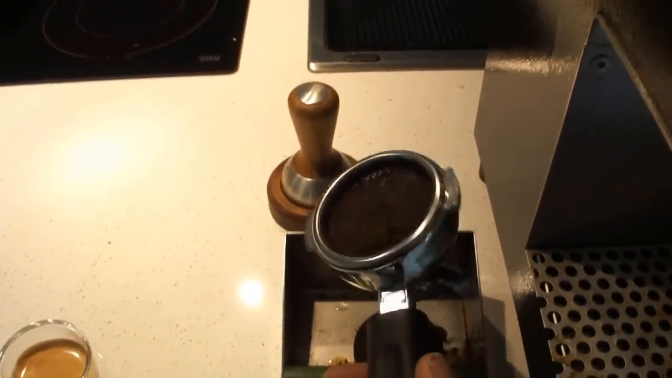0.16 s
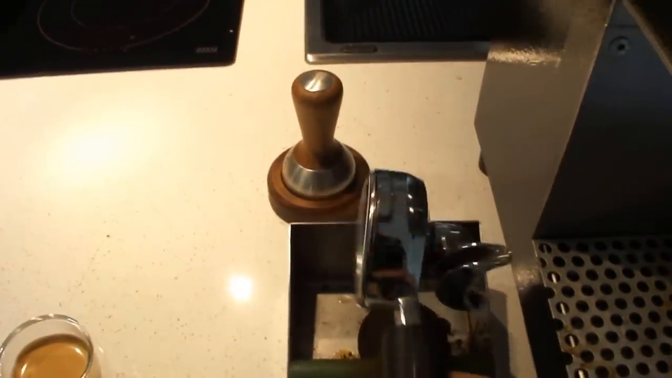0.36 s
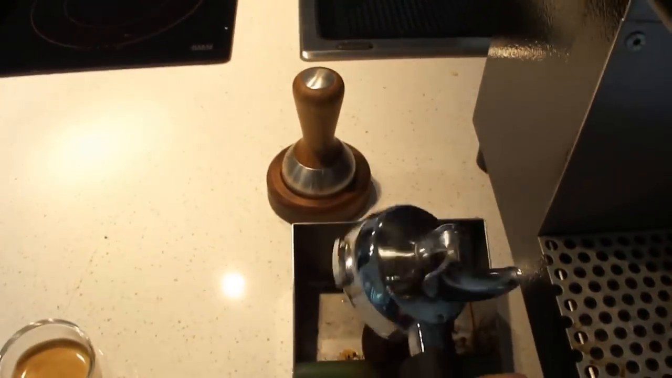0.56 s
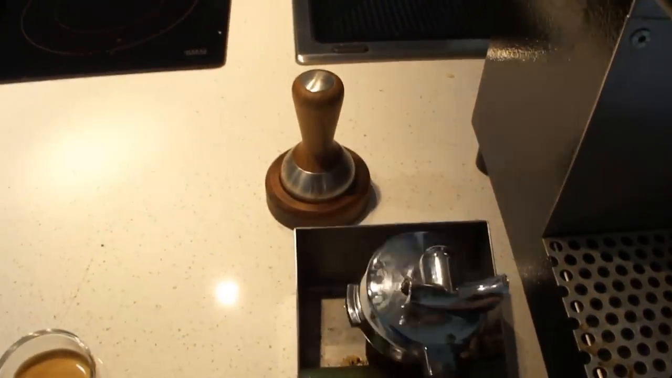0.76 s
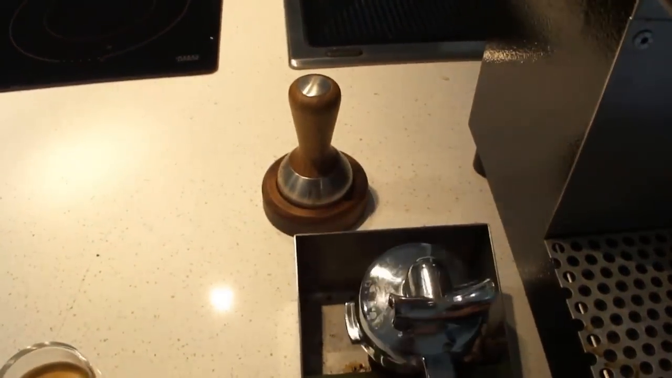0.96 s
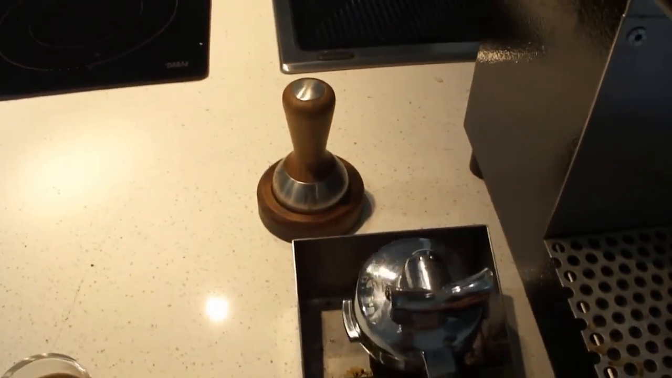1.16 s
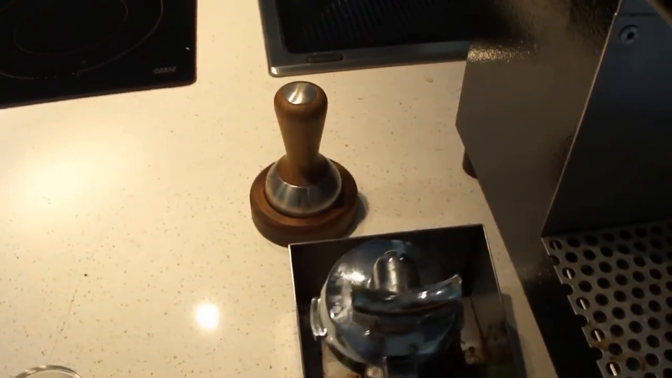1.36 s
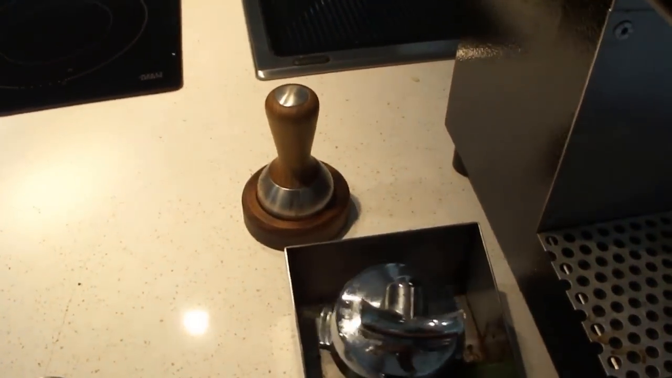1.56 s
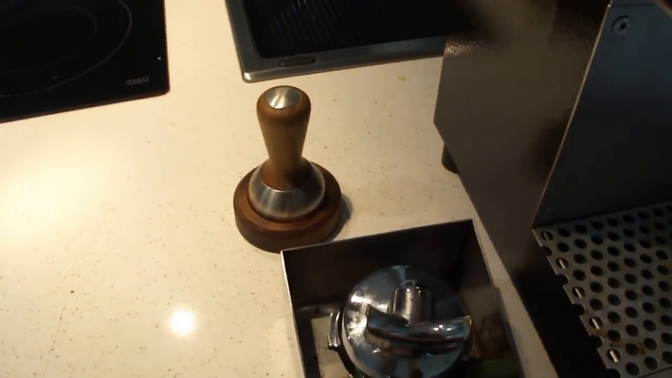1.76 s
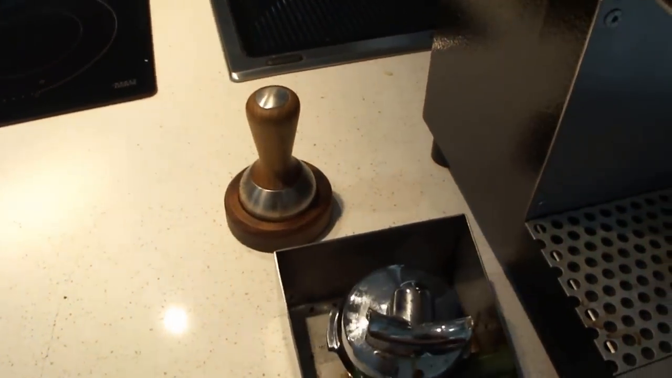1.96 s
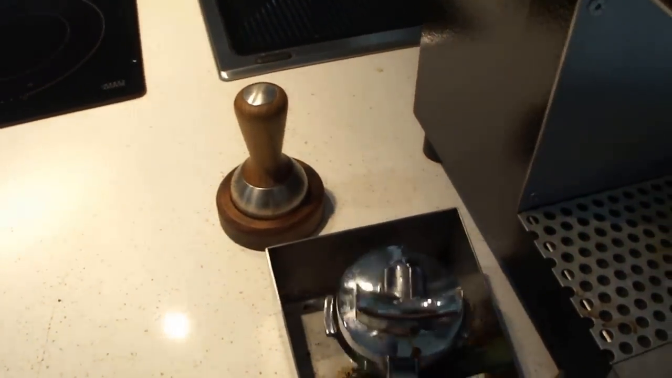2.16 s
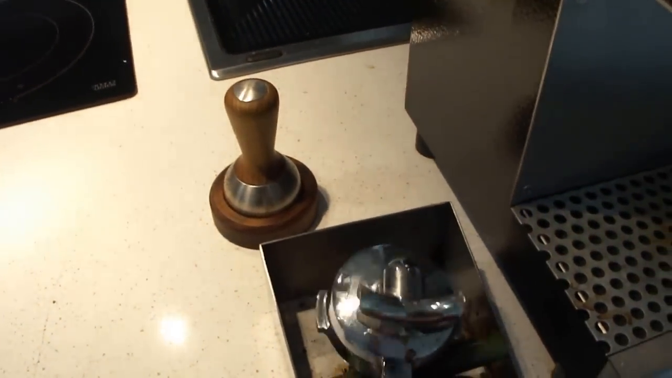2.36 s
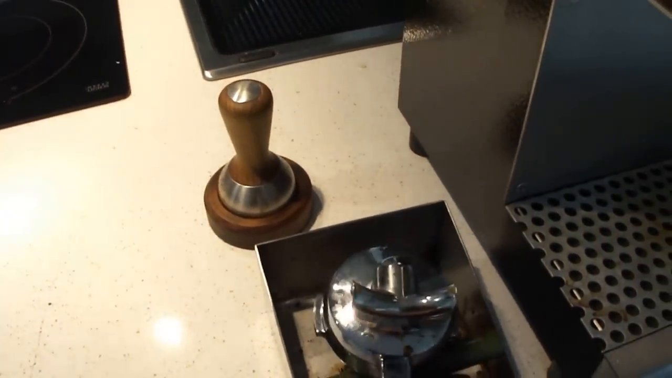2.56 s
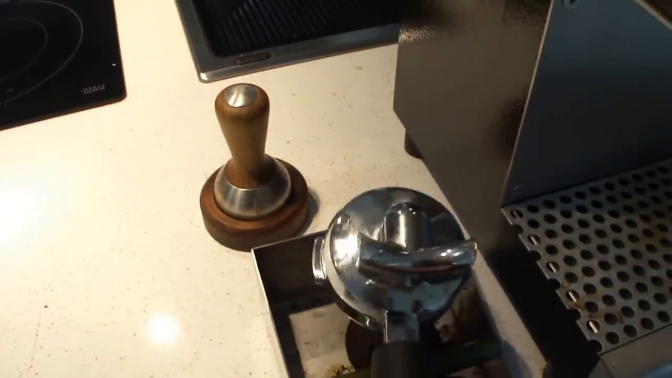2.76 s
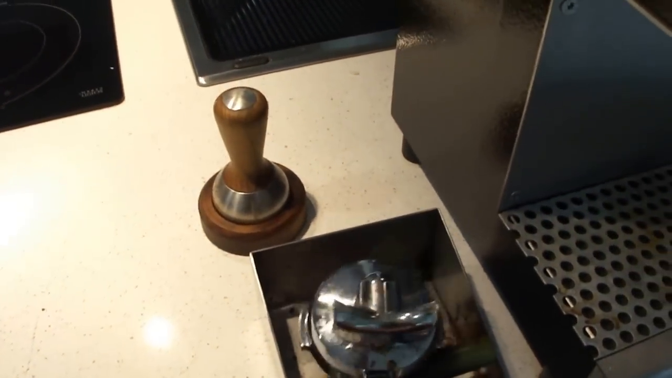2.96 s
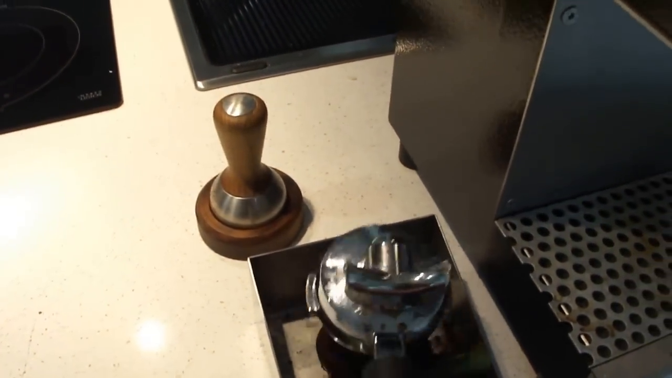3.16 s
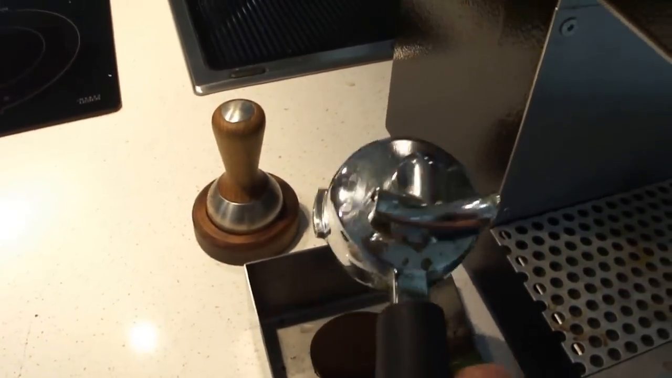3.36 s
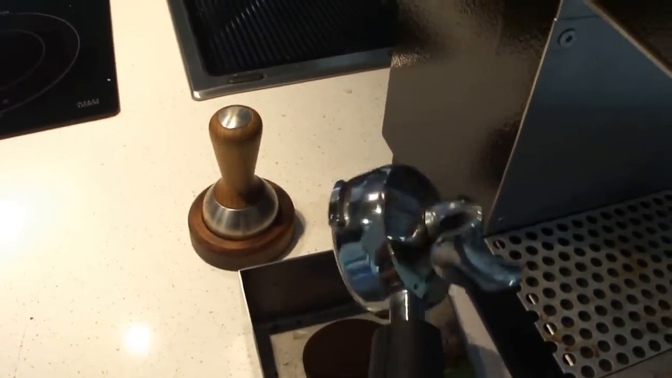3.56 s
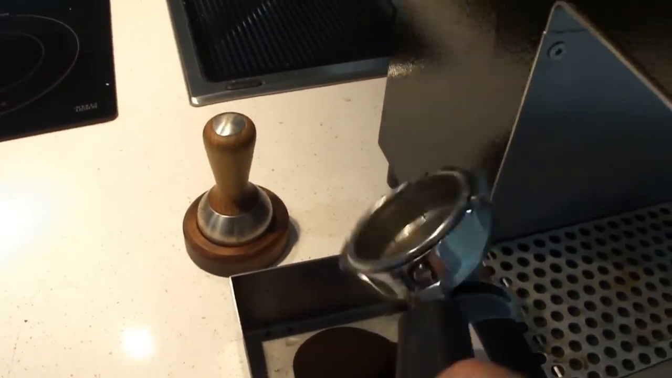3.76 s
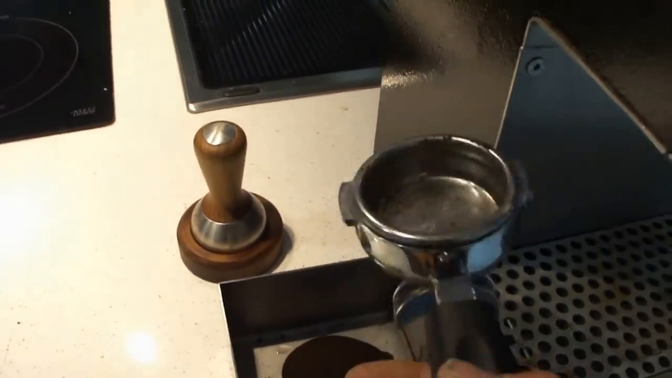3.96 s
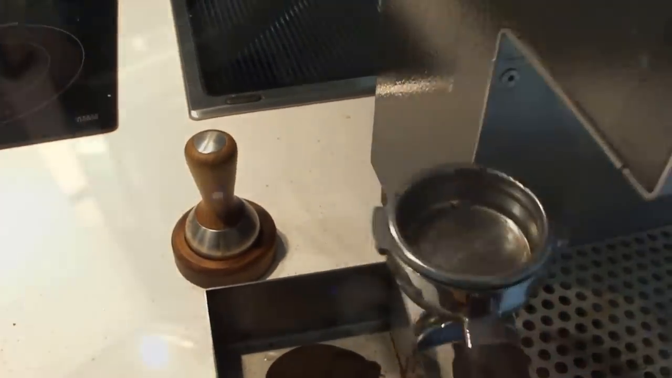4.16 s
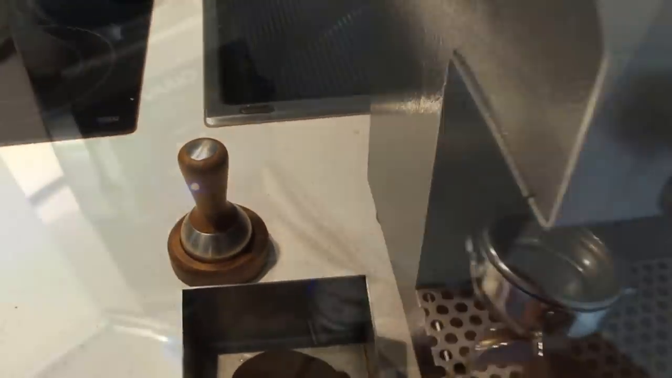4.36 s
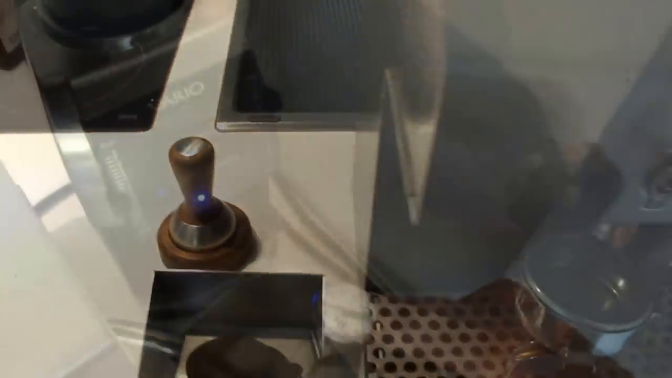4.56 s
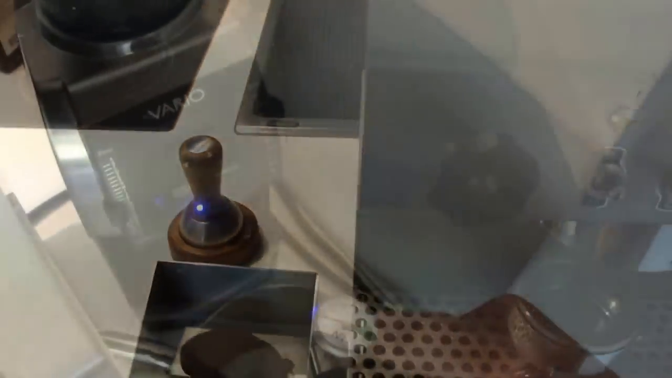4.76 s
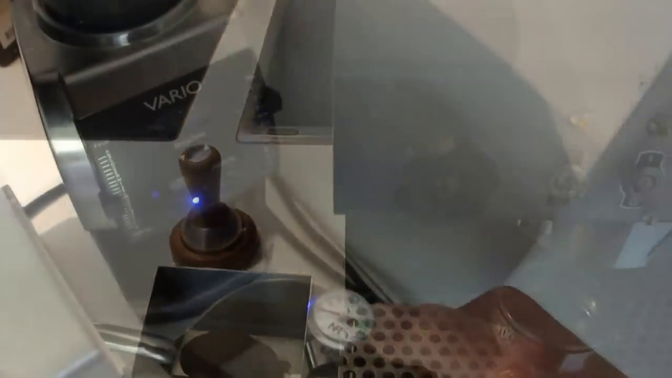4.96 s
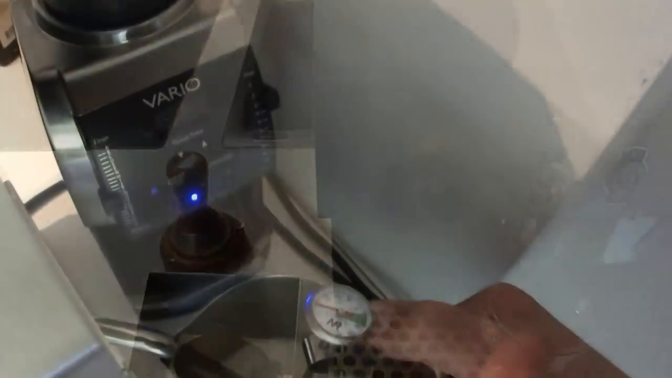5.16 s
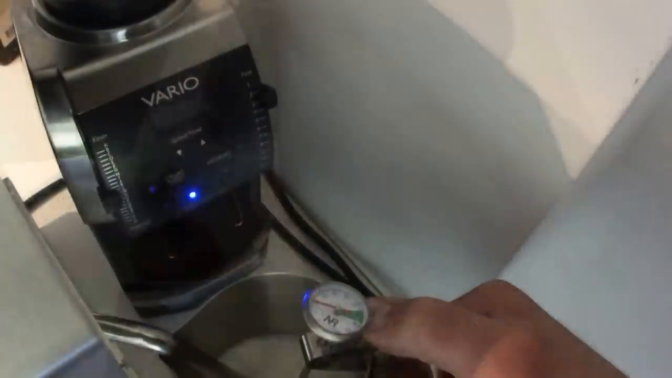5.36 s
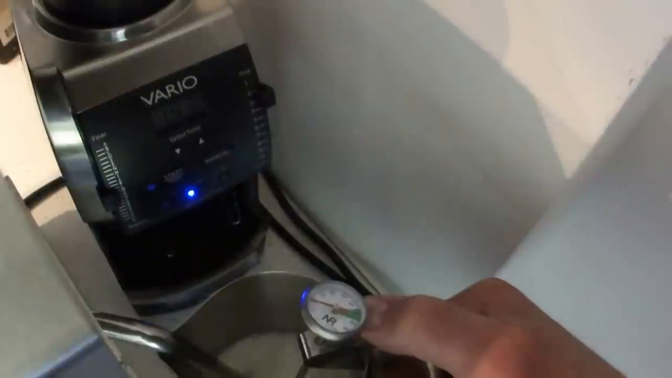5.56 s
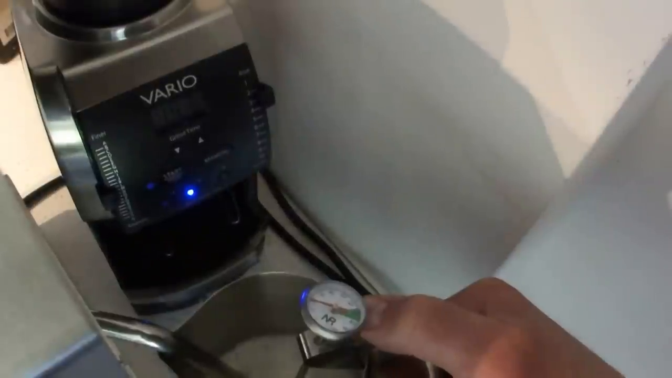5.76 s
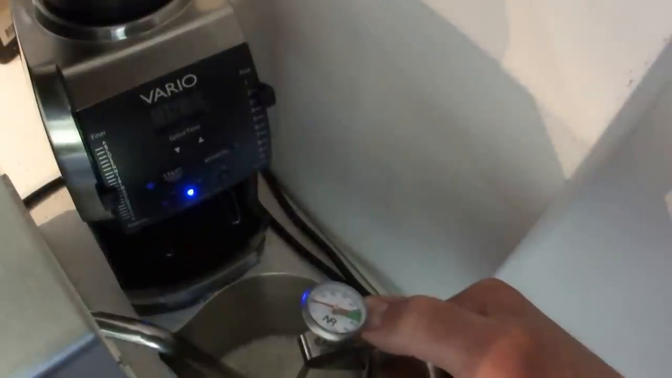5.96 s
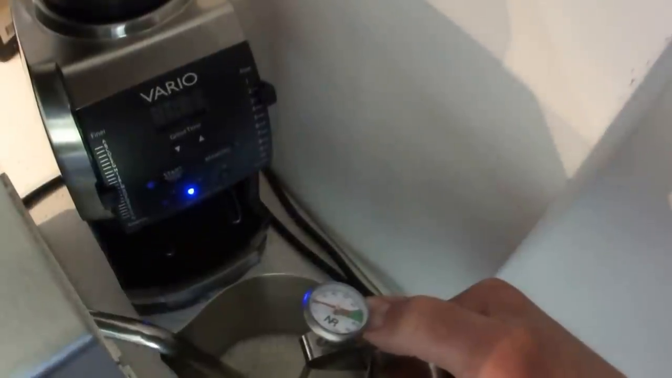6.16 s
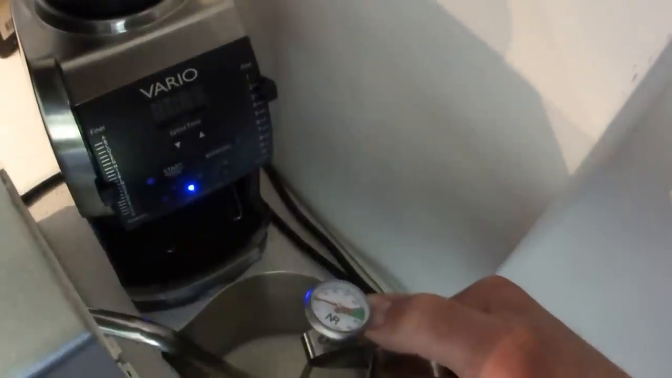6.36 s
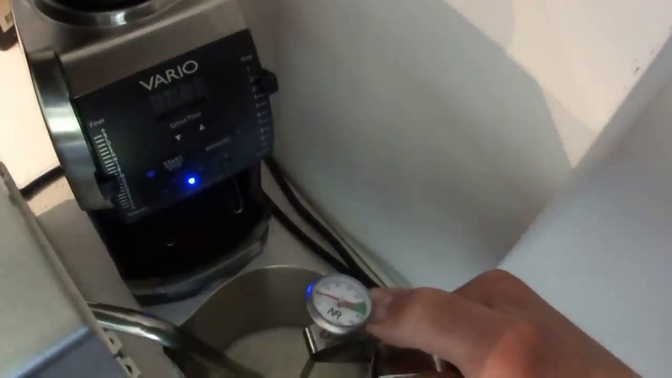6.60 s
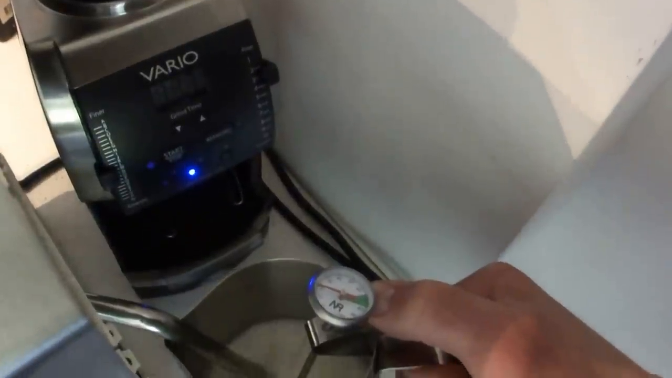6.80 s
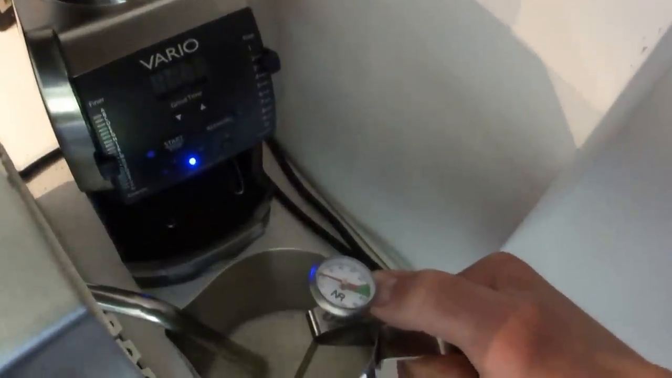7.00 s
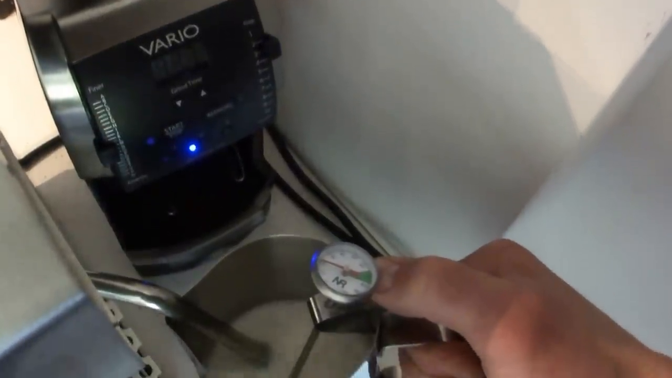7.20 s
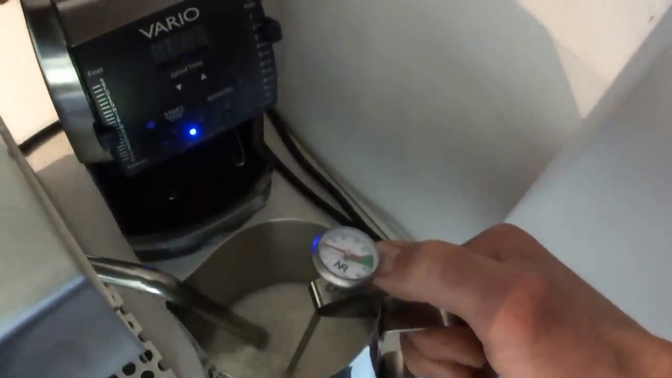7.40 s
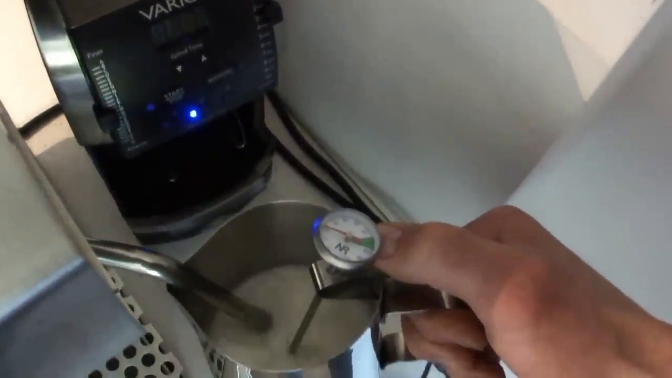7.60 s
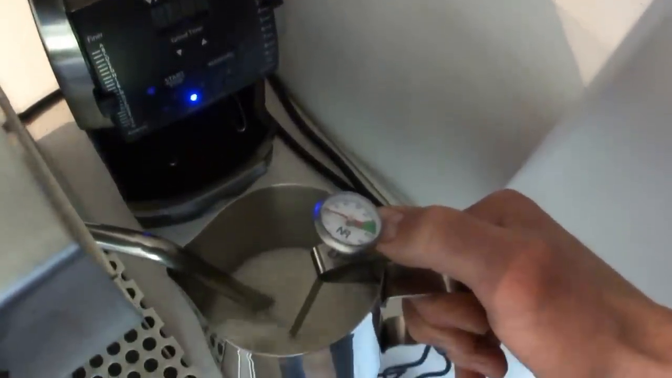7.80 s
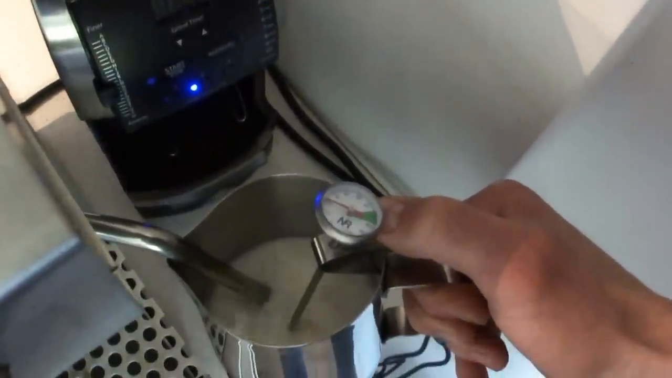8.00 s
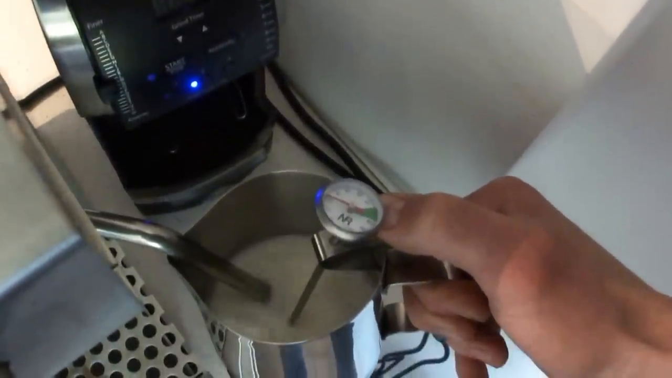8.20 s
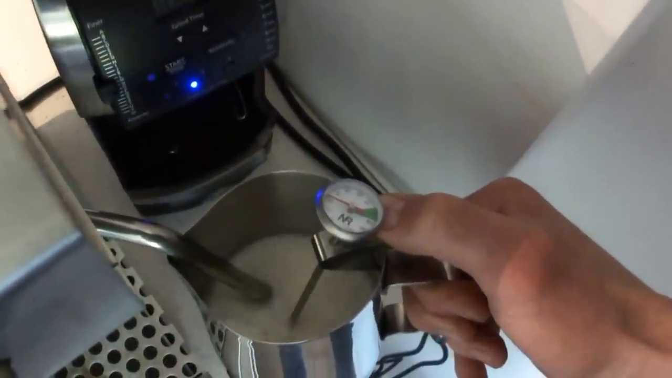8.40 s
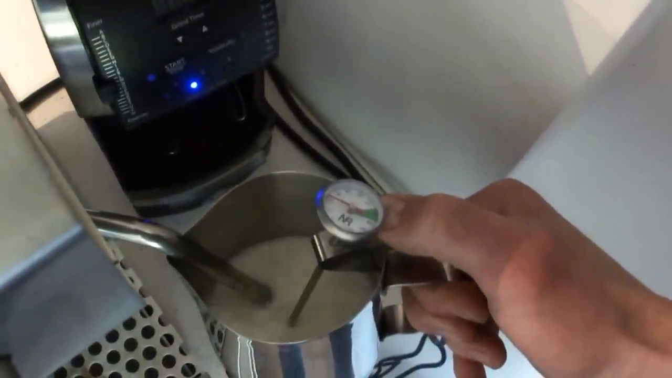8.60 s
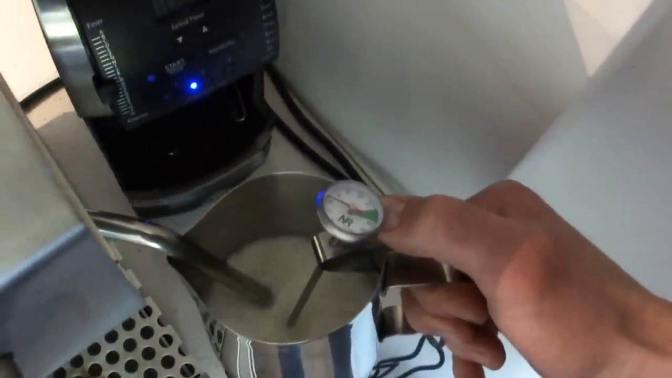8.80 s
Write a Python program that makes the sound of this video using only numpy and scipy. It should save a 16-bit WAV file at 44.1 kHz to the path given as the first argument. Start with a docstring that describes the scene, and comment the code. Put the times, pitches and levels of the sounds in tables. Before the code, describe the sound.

A small hard-walled kitchen, heard close in stereo, with a low appliance drone and thin airy hiss, brushed by faint swishes in the first half second. At about 0.95 s a metal filter basket clacks loudly on a knock box bar, with tiny follow-up contacts; a soft low thud comes at 1.7 s. The background drops around 2.5 s as a hard bang lands, boomy and metallic, followed by a stronger one at 3.0 s, both bouncing quickly and rattling briefly in the room. A faint tap rings at 3.5 s. At 4.1 s steam bursts abruptly into a steel pitcher of milk: ripping spurts and loud hollow gulps around 800 Hz, fiercest until 5.2 s. It then steadies into a lumpy, bubbling roar with fizz and bright jet hiss, a spurt at 6.8 s, a brief dip near 6.9 s, and renewed gulps after 7.9 s, still running at the end.

```python
"""A steam wand sputters open and roars in a steel pitcher of milk: jet hiss, spurts of air, imploding bubbles.
Before it a steel filter basket is set on the bar of a knock box, then banged on it twice, in a hard-walled
kitchen. Decaying modes make the knocks; noise through resonances, under level curves, makes the steam;
decaying sines make the gulps of collapsing bubbles. The sound has notches at 3, 4 and 5 kHz and a broad
dip around 12 to 14 kHz."""
import sys
import numpy as np
from scipy import signal
from scipy.fft import rfft, irfft, next_fast_len
from scipy.io import wavfile
from scipy.ndimage import uniform_filter1d, map_coordinates

SR = 44100
rng = np.random.default_rng(int(sys.argv[2]) if len(sys.argv) > 2 else 0)


def to_wav(sig):
    """Store sig (one row per channel, or 1-D mono) as 16-bit WAV at the path in sys.argv[1].

    Samples outside -1..1 are clipped; the rate is SR.
    """
    pcm = np.clip(np.atleast_2d(sig), -1, 1) * 32767
    pcm = np.round(pcm).astype(np.int16)
    wavfile.write(sys.argv[1], SR, pcm.T)  # frames by channels


N = 389844
T = np.arange(N) / SR  # time in seconds

# Steam in the milk. Each row: time in seconds, then levels in dB of the pitcher roar, the fizz and the jet hiss.
STEAM = [(4.08, -51, -67, -57), (4.13, -51, -40, -48), (4.25, -31.5, -40.5, -40), (4.45, -38.5, -44, -38.5),
         (4.6, -31, -31, -44), (4.73, -29.5, -38, -39), (4.83, -35, -36.5, -41), (5.01, -26, -31.5, -40.5),
         (5.39, -34.5, -37.5, -41), (5.66, -33.5, -35, -39), (5.86, -34.5, -33, -35.5),
         (6.08, -34.5, -33.5, -34.5), (6.6, -31.5, -32, -34), (6.74, -32.5, -34, -31), (6.9, -42, -39, -38),
         (7.17, -38.5, -38.5, -38.5), (7.43, -39.5, -33, -35.5), (7.57, -36, -36.5, -33.5),
         (7.84, -34.5, -35.5, -37), (8.07, -34, -29, -36), (8.28, -33, -35.5, -33.5),
         (8.84, -35, -29, -35.5)]
# Large collapsing bubbles. Each row: start in seconds, peak in dB, pitch in Hz, low part in dB re the peak.
GULPS = [(4.078, -25, 820, -14), (4.108, -19.5, 807, -26), (4.195, -25.5, 789, -28), (4.261, -13, 846, -22),
         (4.315, -10.5, 780, -18.5), (4.463, -23.5, 880, -23), (4.571, -21, 920, -24),
         (4.618, -5, 794, -32), (4.65, -16, 903, -28), (4.77, -21.5, 748, -12), (4.805, -16, 762, -27),
         (4.867, -20.5, 778, -36), (4.919, -19.5, 872, -29), (5.105, -17, 1155, -29),
         (5.193, -18, 882, -29), (5.436, -23, 840, -15.5), (5.594, -21, 842, -36), (5.819, -28.5, 750, -18),
         (6.329, -24.5, 898, -19), (6.787, -18, 786, -39), (7.635, -31, 876, -14), (7.915, -17, 854, -25),
         (7.998, -23, 802, -36), (8.168, -18.5, 734, -23), (8.222, -19.5, 785, -24.5),
         (8.433, -17, 846, -14), (8.624, -22, 853, -35.5), (8.765, -13, 870, -31)]
# Correlation of left and right. Each row: frequency in Hz, likeness (1 is identical).
ALIKE = [(100, 1), (300, 1), (700, 0.99), (1500, 0.91), (2500, 0.91), (6000, 0.78), (10000, 0.38),
         (15000, 0.11)]


def amp(db):
    """Decibel law: 20 dB is a factor of ten in amplitude."""
    return 10 ** (np.asarray(db) / 20)


def unit(x):
    """Normalization to an rms of 1."""
    return x / np.sqrt(np.mean(x ** 2) + 1e-20)


def along(points, hz):
    """Interpolation of (Hz, value) points on a logarithmic frequency axis."""
    f, v = np.transpose(points)
    return np.interp(np.log(hz + 1), np.log(f + 1), v)


def curves(rows):
    """Linear interpolation in time: one value per sample for each column after the time."""
    s, *cols = np.transpose(rows)
    return [np.interp(T, s, c) for c in cols]


def wobble(rate):
    """Slow random modulation: a spline through rate random knots a second."""
    knots = rng.standard_normal(int(N * rate / SR) + 4)
    return map_coordinates(knots, [T * rate])


def filtered(x, response):
    """Linear filtering: the spectrum times a complex response of frequency."""
    m = next_fast_len(x.shape[-1] + SR // 2)
    spectrum = rfft(x, m) * response(np.fft.rfftfreq(m, 1 / SR))
    return irfft(spectrum, m)[..., :x.shape[-1]]


def coloured(points):
    """Spectral colouring: the zero-phase gain of (Hz, dB) points."""
    return lambda hz: amp(along(points, hz))


def resonant(modes):
    """Modal superposition: causal (Hz, width in Hz, dB) resonances of alternating sign."""
    def response(f):
        total = 0
        for k, (c, w, db) in enumerate(modes):
            total = total + (-1) ** k * amp(db) * 1j * f * w / (c * c - f * f + 1j * f * w)
        return total
    return response


def half_angle(alike, hz):
    """Stereo correlation: the angle that shares power between mid and side for a given likeness."""
    return np.arccos(np.clip(along(alike, hz), -1, 1)) / 2


def rush(response, patchy_db, lumps=1, alike=ALIKE):
    """Turbulent noise in stereo, rms 1, with patches of random gain; lumps shape it before the resonances."""
    z = signal.stft(rng.standard_normal((2, N)), nperseg=512)[2]
    field = uniform_filter1d(rng.standard_normal(z.shape[1:]), 6, 0)
    field = uniform_filter1d(field, 10, 1)
    pair = lumps * signal.istft(z * amp(patchy_db * unit(field)), nperseg=512)[1][:, :N]

    def shared(hz):
        turn = half_angle(alike, hz)
        return response(hz) * [np.cos(turn), np.sin(turn)]

    mid, side = filtered(pair, shared)
    return unit(np.array([mid + side, mid - side]))


def kitchen():
    """Background noise under level curves: appliance drone and airy hiss that rise, fall and sink under the steam."""
    # Background. Each row: time in seconds, level of the drone in dB, level of the airy hiss in dB.
    background = [(0.0, -42.5, -51.5), (0.81, -38, -48), (2.48, -40, -50), (2.63, -48, -58),
                  (2.79, -50, -60), (3.05, -48, -59), (3.18, -49, -51), (3.38, -48, -60.5),
                  (4.06, -45, -53)]
    # Spectra of drone and hiss. Each row: frequency in Hz, gain in dB.
    drone_spectrum = [(40, -29), (100, -18), (200, -3.5), (320, 0.5), (1000, -4), (2000, -6.5),
                      (2800, -21.5), (5000, -33.5), (7000, -50)]
    air_spectrum = [(2500, -20), (4500, -18), (6000, 5.5), (7000, -3), (8000, 2), (11000, -8.5),
                    (14000, -22), (15700, -5), (15900, -50)]
    # Brief swells of the hiss. Each row: centre in seconds, peak in dB.
    swishes = [(.26, -48), (.43, -51), (2.0, -53), (3.78, -65), (3.91, -69)]
    # Correlation of left and right. Each row: frequency in Hz, likeness (negative is opposed).
    diffuse = [(100, -0.077), (1400, -0.31), (3100, 0.22), (6800, 0.49), (15000, 0.17)]
    under_steam_db, fade_s, swish_s = -6, 4.5, 0.055  # swish_s: half width of a swell

    drone_db, air_db = curves(background)
    sink = amp(under_steam_db * np.clip((T - STEAM[0][0]) / fade_s, 0, 1))
    air_level = amp(air_db)
    for s, db in swishes:
        air_level += amp(db) * np.exp(-((T - s) / swish_s) ** 2)
    drone = amp(drone_db) * rush(coloured(drone_spectrum), patchy_db=0.5, alike=diffuse)
    air = air_level * rush(coloured(air_spectrum), patchy_db=1.0, alike=diffuse)
    return sink * (drone + air)


def echo():
    """Reverberation: a fresh stereo tail of rattle in the room; each frequency dies at its own speed."""
    # Spectrum of the rattle. Each row: frequency in Hz, level in dB.
    rattle_spectrum = [(50, -38), (140, 8.5), (300, -5.5), (1000, 3.5), (2000, -7), (3500, -20.5),
                       (6500, -6.5), (10000, -9.5), (16000, -20)]
    # Absorption by the hard walls. Each row: frequency in Hz, time in seconds to fall 60 dB.
    walls = [(100, 0.59), (500, 0.54), (2000, 0.71), (6000, 0.51), (15000, .2)]
    hz, t, z = signal.stft(rng.standard_normal((2, SR // 2)), SR, nperseg=256)
    turn = half_angle(ALIKE, hz)[:, None]
    signs = np.array([1, -1])[:, None, None]
    z = np.cos(turn) * z[0] + signs * np.sin(turn) * z[1]
    decay_db = along(rattle_spectrum, hz)[:, None] - 60 * t / along(walls, hz)[:, None]
    return signal.istft(z * amp(decay_db), SR, nperseg=256)[1][:, :SR // 2]


def knocks():
    """Impact excitation of modes: contacts crack and ring basket and box; loose parts flutter, the room rattles."""
    # Basket contacts. Each row: start in seconds, level in dB, kind.
    contacts = [(0.954, -2.5, "clack"), (.998, -22, "clack"), (1.013, -20.5, "clack"), (1.729, -21, "thud"),
                (2.452, -6.5, "bang"), (2.461, -12.5, "bang"), (2.49, -13.5, "bounce"),
                (3.012, -4.5, "bang"), (3.016, -9, "bang"), (3.038, -12, "bounce"),
                (3.074, -13.5, "bounce"), (3.534, -29.5, "tap")]
    # Modes of box and basket. Each row: frequency in Hz, relative level in dB, seconds to fall 60 dB (unscaled).
    modes = [(148.6, 6, 0.3), (177, -4, 0.37), (263, -5.5, 0.57), (302, 4.5, 0.22), (425, -0.5, 0.24),
             (650, -16, .4), (766, 1.5, 0.12), (991, -0.5, 0.35), (1057, -9.5, 0.49), (1510, -9, 0.26),
             (1534, -10, 0.47), (1768, -4.5, .2), (1820, -5, 0.33), (1878, -9, .2), (2023, -8.5, 0.52),
             (3424, -17, 0.47), (4445, -11, 0.13), (6400, 2, .6), (6620, -8, .3), (7200, 1, .5),
             (7410, -7, .4), (7840, -3, .5), (8280, -3, .45), (9370, -8, .4)]
    # Kinds of contact. Each entry: boom, thud, clank and treble in dB, factors on the ring times
    # of box and basket, rattle in dB.
    kinds = {"clack": (-29, -25, 2, -31.5, 0.7, 0.48, -16.5),
             "thud": (-0.5, -10, -25, -24, 0.97, 0.35, -35), "bang": (-3, 1, -0.5, -6.5, 0.5, 0.62, 0.5),
             "bounce": (-3.5, -3, 5, -12, 1.14, 1.1, -3), "tap": (-22, -10, 5, -32, 1.3, 0.45, -5)}
    box_top_hz = 500  # modes below belong to the knock box, those above to the basket

    out, t = np.zeros((2, N + SR)), np.arange(SR // 2) / SR
    hz, level, t60 = np.transpose(modes)[..., None]
    for s, db, kind in contacts:
        boom_db, thud_db, clank_db, treble_db, box_share, basket_share, rattle_db = kinds[kind]
        share = np.where(hz < box_top_hz, box_share, basket_share)
        # each mode wavers in level and phase, 45 random knots a second
        knots = rng.standard_normal((2, len(modes), 32))
        flutter, drift = (np.array([np.interp(t * 45, np.arange(32), k) for k in part]) for part in knots)
        loose_db = 3.5 * flutter * np.clip(t / .05, 0, 1)
        phase = 2 * np.pi * hz * t + .5 * (drift - drift[:, :1])
        ring = np.sum(amp(level + loose_db - 60 * t / (t60 * share)) * np.sin(phase), axis=0)
        crack = 3.2 * amp(-60 * t / 0.04) * rng.standard_normal(len(t))
        rattle = amp(rattle_db) * echo() * (1 - amp(-60 * t / 0.0021))
        sound = amp(-13.5) * (ring + crack) + rattle
        # padded or bare contact
        tilt = [(190, boom_db), (250, thud_db), (450, thud_db), (620, 2.5), (1080, 2.0), (1270, -2),
                (1450, clank_db), (2200, clank_db), (2600, -4.5), (4000, treble_db)]
        onset = np.clip(t / 0.0014, 0, 1)
        out[:, round(s * SR):][:, :len(t)] += amp(db) * onset * filtered(sound, coloured(tilt))
    return out[:, :N]


def blows(rows, rise, tail_db, tail_t60):
    """Power addition of incoherent bursts (s, dB, hold s, t60 s) with a weaker room tail; gives amplitude."""
    power = np.zeros(N + SR)
    t = np.arange(SR // 2) / SR
    for s, db, hold, t60 in rows:
        after = np.maximum(t - hold, 0)
        direct = amp(db - 60 * after / t60) ** 2
        tail = amp(db + tail_db - 60 * after / tail_t60) ** 2
        power[round(s * SR):][:len(t)] += (direct + tail) * np.clip(t / rise, 0, 1) ** 2
    return np.sqrt(power[:N])


def pops(rate, spread_db):
    """Shot noise of implosions: short pushes at random moments; with spread, a few are far stronger."""
    count = int(rate * N / SR)
    when, size = rng.random((count, 2)).T
    strength = amp(-spread_db * np.log(size + .1))
    drive = np.bincount((when * N).astype(int), strength, N)
    return uniform_filter1d(drive, size=130) * 130  # each push lasts 130 samples


def steam():
    """Resonance driven by implosions: bubbles in uneven clumps drive pitcher and milk; the jet itself hisses."""
    # Resonances of the milk and the air column over it, of the churning milk and of small bubbles.
    # Each row: frequency in Hz, width in Hz, level in dB.
    pitcher = [(280, 148, -10), (538, 176, -8), (837, 218, 0)]
    churn = [(1075, 470, -2.5), (1420, 199, 3.5), (1689, 510, -1)]
    bubbles = [(2250, 220, 1), (2606, 264, 0.5), (3160, 820, -12.5), (4560, 190, -7.5)]
    # Spectra of the jet and of tearing air. Each row: frequency in Hz, gain in dB.
    jet_spectrum = [(1500, -50), (4000, -22), (5700, 4.5), (6700, 6), (8000, 2), (9200, -4), (10000, -3.5),
                    (12000, -23), (15000, -29), (15800, -30), (16200, -38)]
    spurt_spectrum = [(500, -30), (2000, -20), (4500, -1.5), (6500, 7.5), (9000, 9.5), (11000, 5.5),
                      (13000, 3), (15000, -2), (15800, 4), (16400, -43)]
    # The tip breaks the surface and air tears in. Each row: start in seconds, peak in dB,
    # hold in seconds, time in seconds to fall 60 dB.
    spurts = [(4.078, -11, 0.0016, 0.08), (4.104, -11.5, 0.0088, .04), (4.119, -12, 0.022, .03),
              (4.193, -7.5, 0.0036, 0.02), (4.251, -10.5, 0.068, 0.046), (4.325, -12, 0.038, .08),
              (4.384, -10.5, 0.0041, 0.032), (4.615, -10, 0.0029, 0.013), (4.665, -2, 0.0047, 0.093),
              (4.701, -6, 0.0078, 0.02), (4.767, -5, 0.0045, 0.1), (4.946, -17, 0.036, 0.23),
              (5.02, -21, 0.081, 0.25), (5.102, -16, 0.021, 0.06), (5.118, -7, 0.0092, 0.18),
              (5.96, -24, 0.018, 0.1), (6.391, -28, 0.038, 0.12), (6.489, -19.5, 0.013, 0.12),
              (6.781, -7.5, 0.0055, 0.033), (6.893, -23, 0.006, 0.035), (7.06, -30.5, 0.0079, 0.043),
              (7.545, -27.5, 0.013, 0.06), (7.726, -22.5, 0.0064, 0.051), (7.774, -25, 0.0091, 0.067),
              (8.385, -25, 0.024, 0.11)]
    gush_db, gush_follows_roar = -3, 0.49  # the gush lies between roar and fizz
    stir_db, stir_hold_s, stir_t60_s = -16.5, 0.0073, 0.38  # a collapse stirs the roar up, under its own peak
    splash_db = -28  # a spurt whips the milk: gush and fizz under its peak
    crest_db = 6.5  # peaks of the tearing noise over its rms

    roar_db, fizz_db, jet_db = curves(STEAM)
    gush_level_db = gush_db + fizz_db + gush_follows_roar * (roar_db - fizz_db)
    bursts = blows(spurts, rise=0.00081, tail_db=-13.5, tail_t60=0.37)
    stirs = [(s, db + stir_db, stir_hold_s, stir_t60_s) for s, db, *_ in GULPS]
    stir = blows(stirs, rise=0.0068, tail_db=-2, tail_t60=0.46)
    splash = amp(splash_db) * bursts + amp(-13.5) * stir
    opening = np.clip((T - STEAM[0][0]) / 0.0037 + 1, 0, 1)

    surge = wobble(30)  # common to roar, gush and fizz
    roar_lumps = amp(1.6 * surge) * (0.5 + 0.56 * pops(45, spread_db=0))
    roar = np.hypot(amp(roar_db), stir) * rush(
        lambda f: resonant(pitcher)(f) ** 2, patchy_db=0.33, lumps=roar_lumps)
    gush_lumps = amp(0.36 * surge + 1.8 * wobble(110))
    gush = np.hypot(amp(gush_level_db), splash) * rush(
        lambda f: resonant(churn)(f) ** 2, patchy_db=2.0, lumps=gush_lumps)
    fizz_lumps = amp(1.55 * surge) * (1.5 + 0.49 * pops(70, spread_db=5.5))
    fizz = np.hypot(amp(fizz_db), splash) * rush(resonant(bubbles), patchy_db=2.0, lumps=fizz_lumps)
    jet_lumps = amp(1.15 * wobble(35)) * (1.5 + 0.26 * pops(44, spread_db=7.5))
    jet = amp(jet_db) * rush(coloured(jet_spectrum), patchy_db=3.15, lumps=jet_lumps)
    tearing = amp(-crest_db) * bursts * rush(
        coloured(spurt_spectrum), patchy_db=3.5, lumps=amp(0.53 * wobble(350)))
    return opening * (roar + gush + fizz + jet) + tearing


def gulps():
    """Free decay of an air column: a collapsing bubble rings it and sets the milk splattering lower down."""
    rise_s, ring_t60_s, splatter_t60_s = 0.0086, 0.049, 0.18
    column, drive, t = np.zeros(N + SR), np.zeros(N + SR), np.arange(SR // 8) / SR
    rise = 1 - amp(-60 * t / rise_s)
    ring = rise * amp(-60 * t / ring_t60_s)
    for s, db, hz, low_db in GULPS:
        start = round(s * SR)
        column[start:][:len(t)] += amp(db) * ring / ring.max() * np.sin(2 * np.pi * hz * t)
        drive[start:][:len(t)] += rise * amp(db + low_db - 60 * t / splatter_t60_s)
    low_modes = resonant([(280, 220, 0), (600, 500, -8)])
    splatter = drive[:N] * rush(lambda f: low_modes(f) ** 2, patchy_db=-0.5)
    return column[:N] + splatter


def scene():
    """Linear superposition of all sources; kitchen and knocks lean slightly to the left."""
    return (kitchen() + knocks()) * amp([[.3], [-.3]]) + steam() + gulps()


def record(dry):
    """Linear filtering and saturation: notches, a broad treble dip, a bass cut, soft overload, the band limit."""
    # Notches at 3, 4 and 5 kHz and a broad dip around 12 to 14 kHz. Each row: frequency in Hz, width in Hz.
    notches = [(3000, 445), (4000, 530), (5000, 670), (12000, 2680), (12700, 2440), (13400, 2350)]
    top_hz, bass_hz, ceiling = 16700, 90, .92

    def response(f):
        notch = np.prod([(c * c - f * f) / (c * c - f * f + 1j * f * w) for c, w in notches], axis=0)
        bass_cut = (1j * f / (1j * f + bass_hz)) ** 2
        return notch * bass_cut

    x = filtered(dry, response)
    x = x / (1 + np.abs(x / ceiling) ** 8) ** (1 / 8)
    return filtered(x, lambda hz: hz < top_hz)


dry = scene()
out = record(dry)
to_wav(out)
```